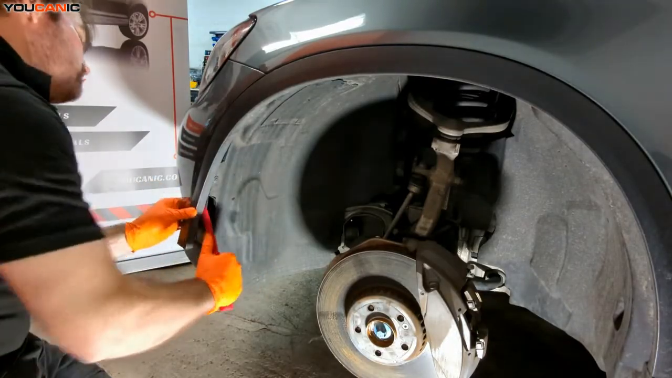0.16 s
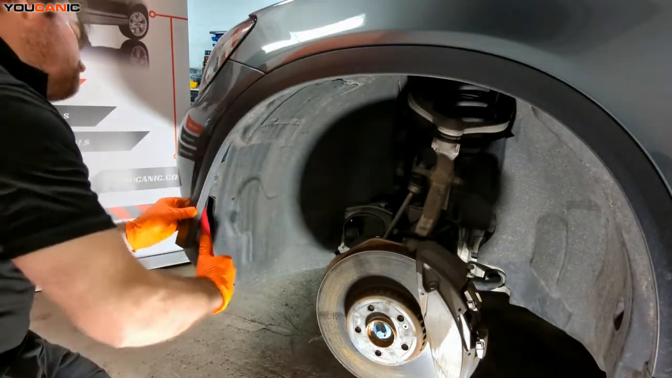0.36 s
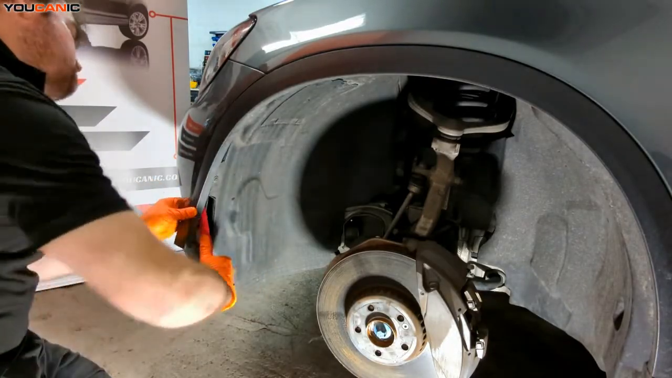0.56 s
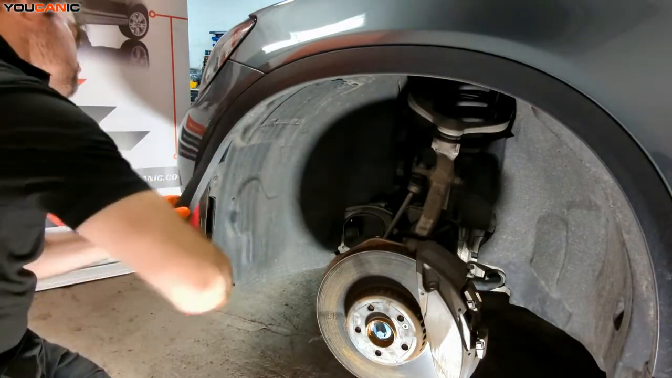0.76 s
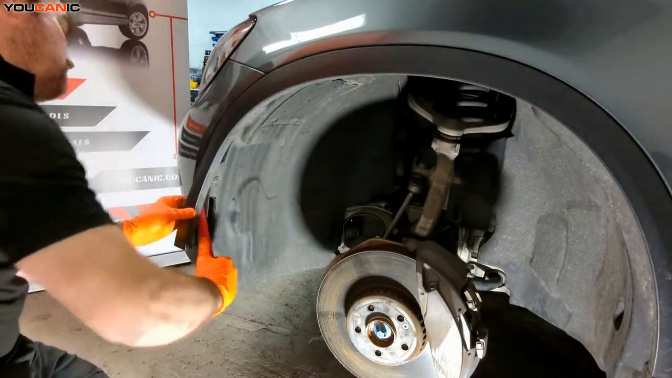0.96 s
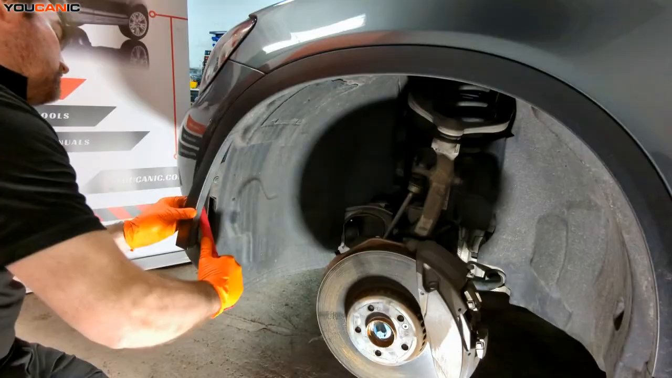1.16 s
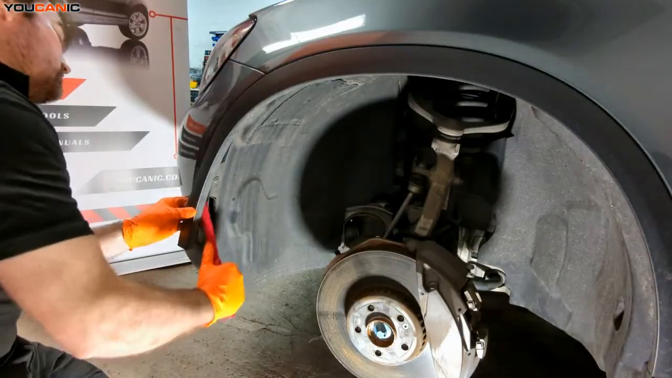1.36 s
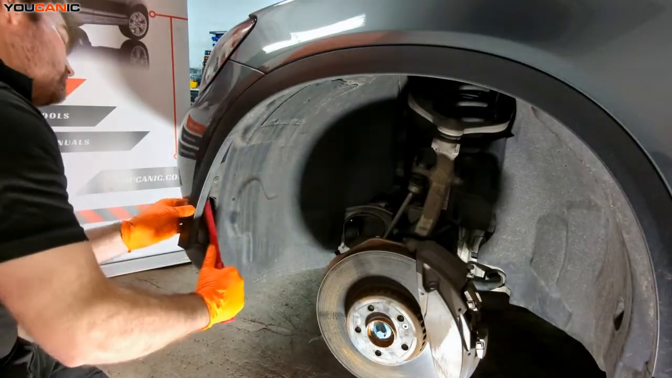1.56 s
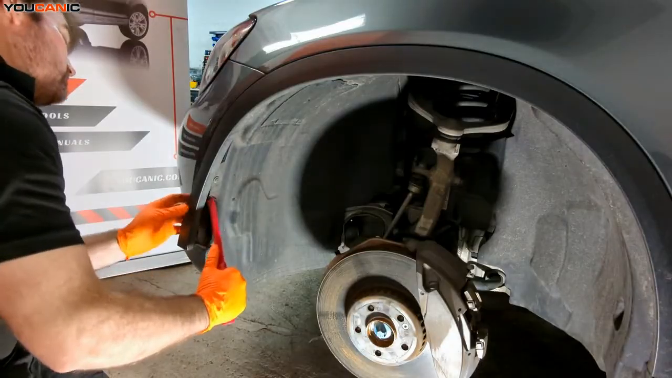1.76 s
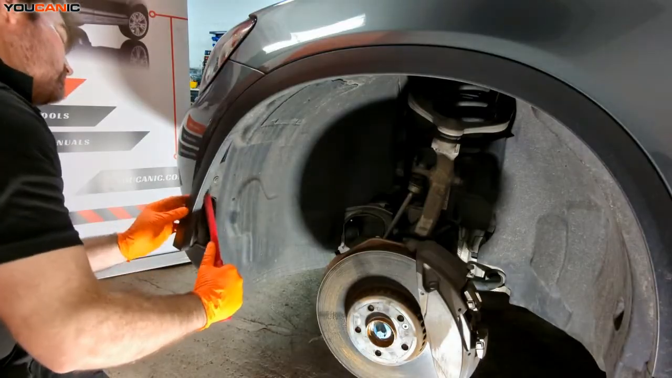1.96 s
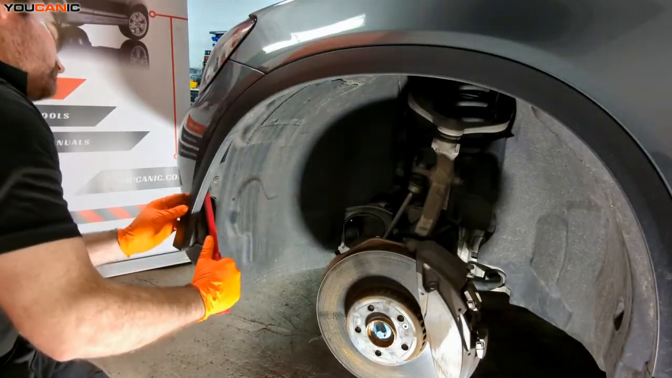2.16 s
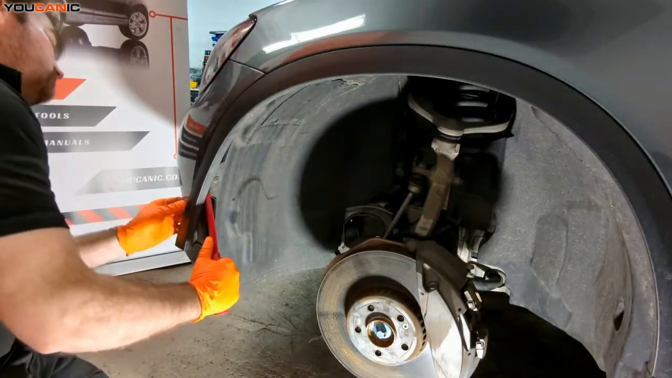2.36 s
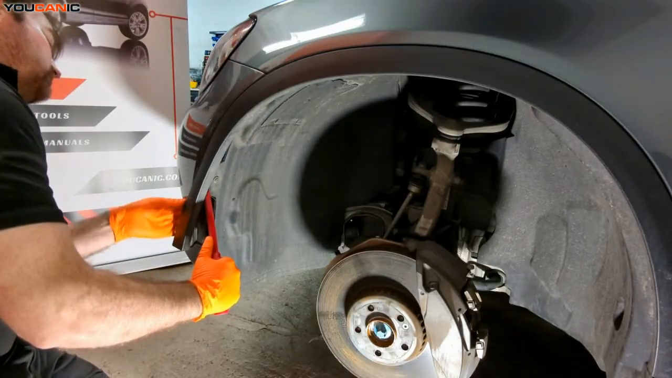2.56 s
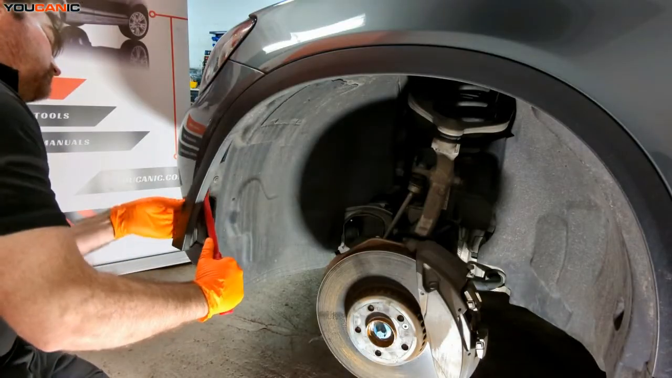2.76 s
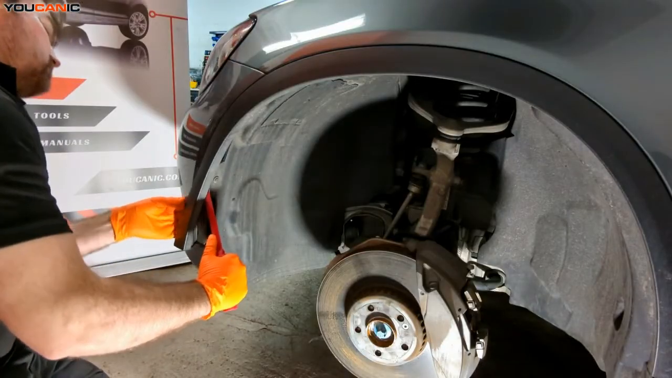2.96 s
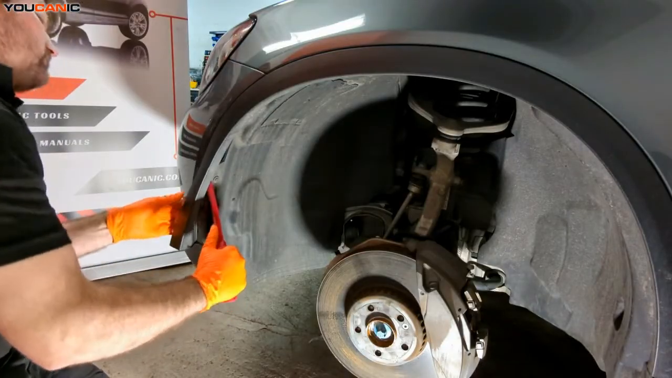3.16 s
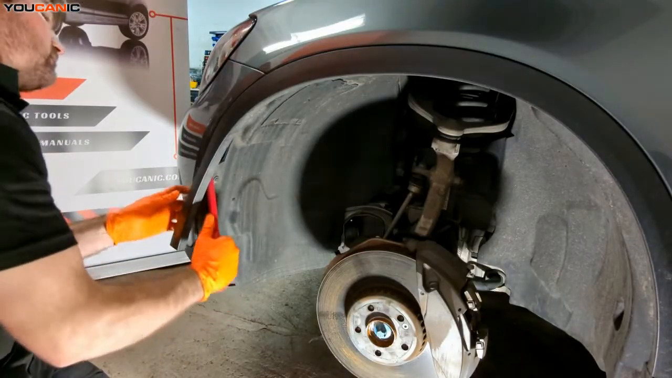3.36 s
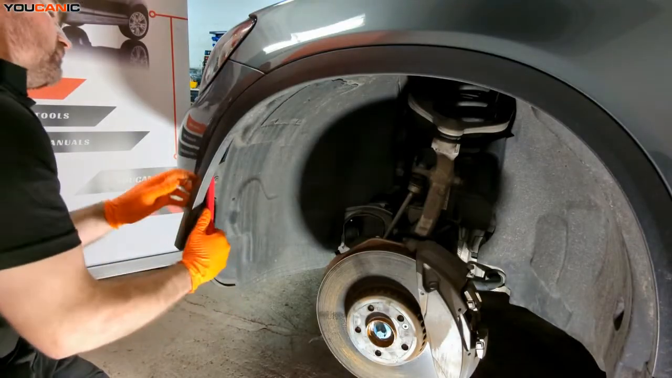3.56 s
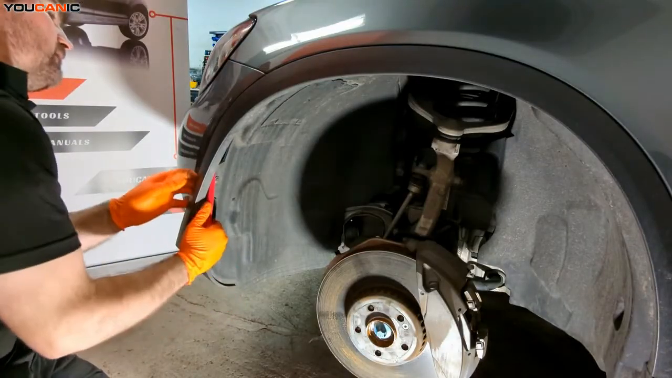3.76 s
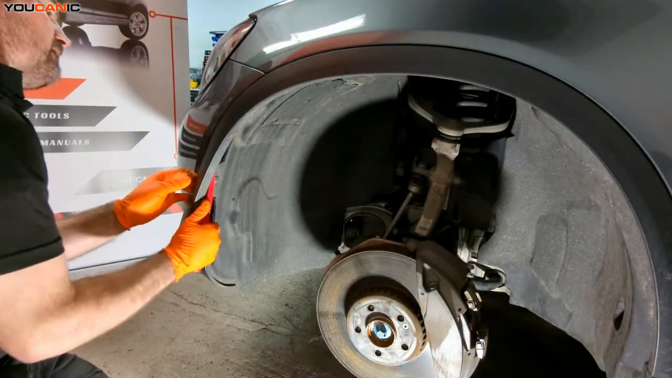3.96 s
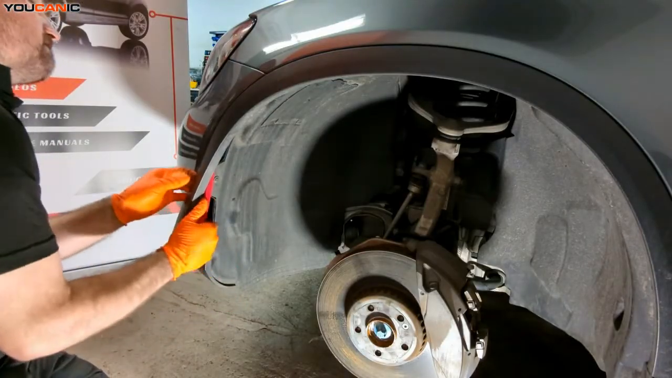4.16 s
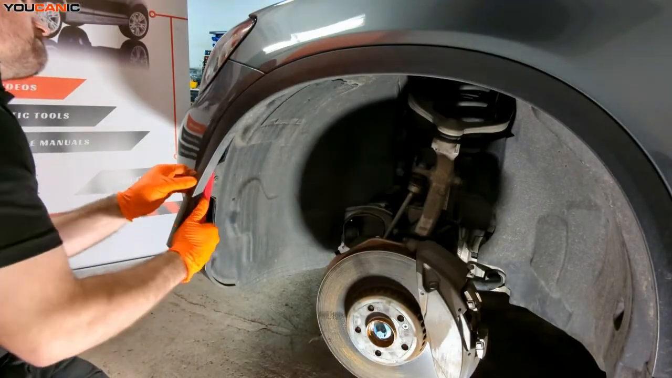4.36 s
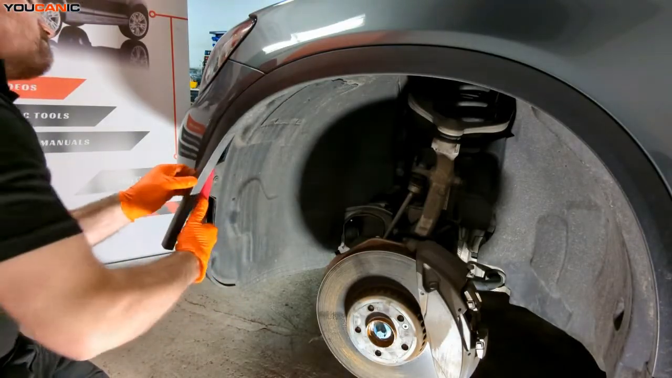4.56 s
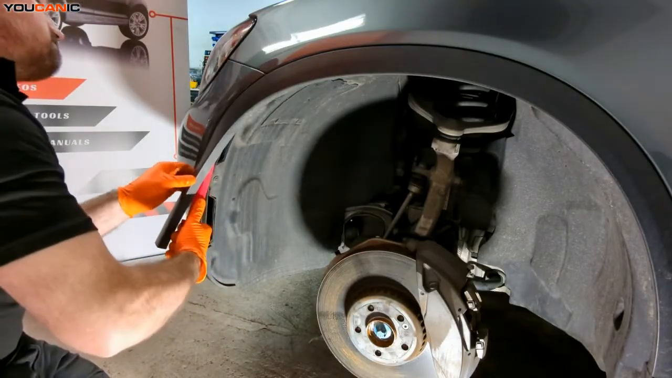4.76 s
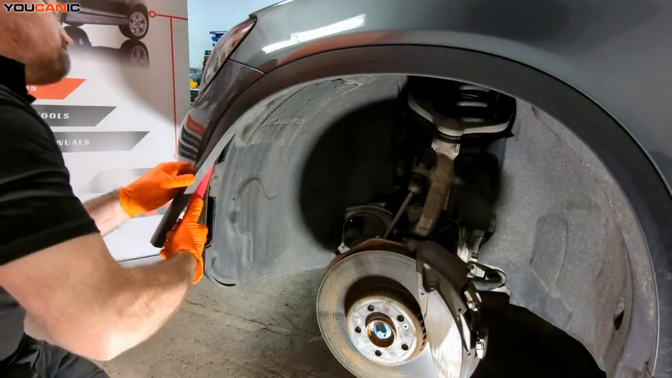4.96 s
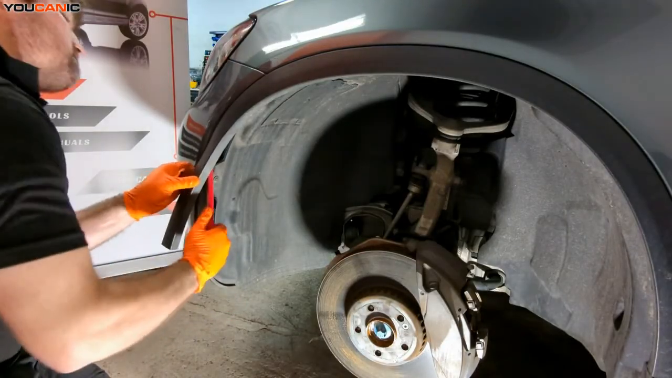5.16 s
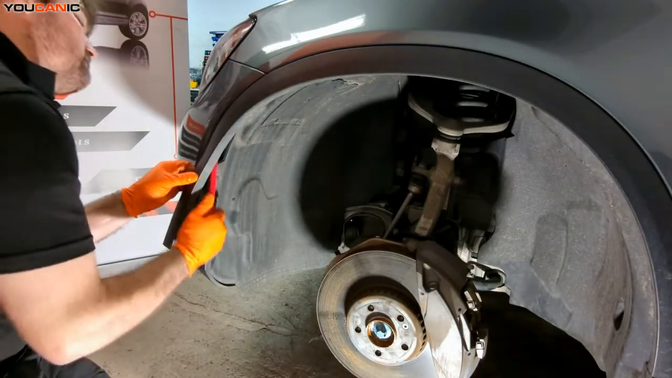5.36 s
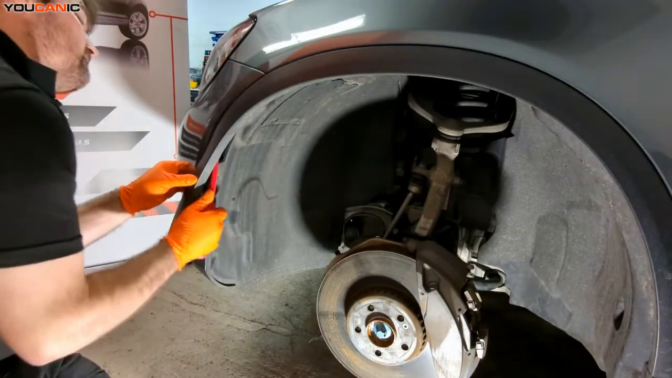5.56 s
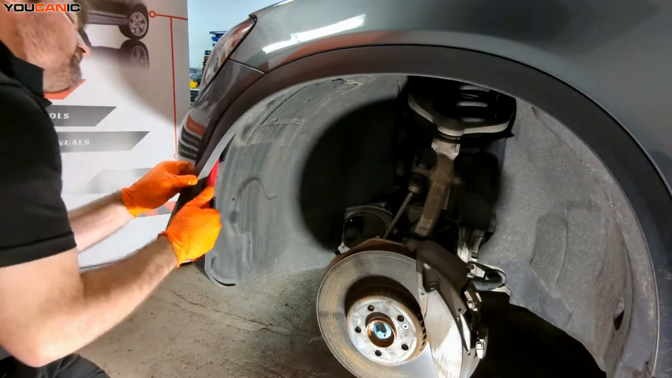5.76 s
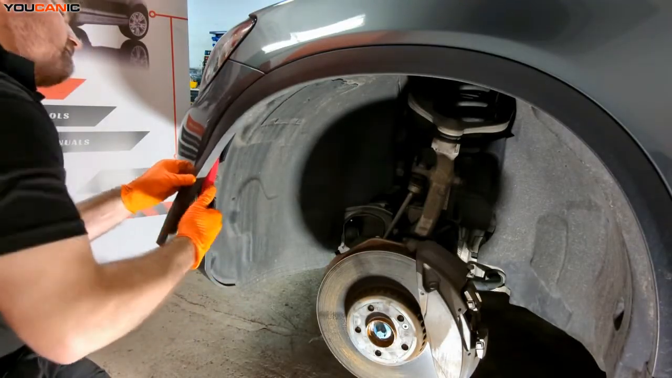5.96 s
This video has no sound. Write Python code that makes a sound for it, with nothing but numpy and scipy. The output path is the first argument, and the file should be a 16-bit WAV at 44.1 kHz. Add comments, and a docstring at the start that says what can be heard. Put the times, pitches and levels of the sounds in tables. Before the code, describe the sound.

Clips snap loose as a plastic strip is levered from a car's wing, with knocks, glove rubbing and a faint machine hum.

```python
"""Plastic trim is levered off a car wheel arch in a bare workshop, over a low machine hum. After a soft
scrape, three clips let go with a crack in the first 2.2 s; each time the strip flexes and the wing panel
rings. From 3 s gloves and tool scrape more busily and the strip thuds on the panel. A last loud clip snaps
at 4.8 s, then light knocks and rubs follow. All along, the right channel slips in steps against the left."""
import sys
import numpy as np
from scipy import signal
from scipy.io import wavfile
from scipy.ndimage import uniform_filter1d

SR = 44100
rng = np.random.default_rng(int(sys.argv[2]) if len(sys.argv) > 2 else 0)


def put_to_file(sound):
    """Save the sound as 16-bit audio at rate SR, in the file named by the first command-line argument."""
    columns = np.atleast_2d(sound).T  # one column per channel
    safe = np.clip(columns, -1, 1)
    whole_steps = np.round(safe * 32767)
    wavfile.write(sys.argv[1], SR, whole_steps.astype(np.int16))


N = 264600

# How long the workshop rings. Each row: frequency in Hz, t60 in seconds.
ROOM_T60 = [(100, 0.64), (200, 0.57), (500, 0.67), (1000, 0.66), (2000, 0.62), (4000, 0.6), (8000, 0.5),
            (14000, 0.4)]
# Stereo image of the noises. Each row: frequency in Hz, left-right likeness from 0 to 1.
STEREO_LIKENESS = [(100, 0.86), (500, 0.55), (1500, 0.057), (5000, 0.11)]


def gain_of(db):
    """Decibels to an amplitude factor."""
    return 10 ** (np.asarray(db) / 20)


def unit_rms(x):
    """Scales to rms 1."""
    return x / np.sqrt(np.mean(x ** 2) + 1e-20)


def curve_at(points, hz):
    """Reads a table on a log-frequency axis."""
    f, value = np.transpose(points)
    return np.interp(np.log(hz + 1), np.log(f + 1), value)


def add(mix, start, sound):
    """Mixes a sound in at a start time in seconds."""
    part = mix[:, round(start * SR):][:, :sound.shape[-1]]
    part += sound[..., :part.shape[1]]


def hump(hz, centre_hz, width):
    """A broad resonance; width is a share of its centre."""
    return 1 / np.sqrt(1 + ((hz / centre_hz - centre_hz / (hz + 1)) / width) ** 2)


def ring(t, hz, t60, rise):
    """One mode: swells over the rise time, then dies."""
    return (1 - np.exp(-t / rise)) * gain_of(-60 * t / t60) * np.sin(2 * np.pi * hz * t)


def stereo_spectra(hz, a, b, c, d):
    """Four random grids become left and right spectra, centred in the bass and wide in the treble."""
    likeness = curve_at(STEREO_LIKENESS, hz)[:, None]
    left = a + 1j * b
    return np.array([left, likeness * left + np.sqrt(1 - likeness ** 2) * (c + 1j * d)])


def noise(colour, patchy_db=0.):
    """A stereo noise bed of a given spectrum; patchy_db adds drifting patches."""
    hz = np.fft.rfftfreq(1024, 1 / SR)
    *grids, patches = rng.standard_normal((N // 256 + 5, 513, 5)).T
    patches = unit_rms(uniform_filter1d(uniform_filter1d(patches, 8, 0), 12, 1))
    spectra = stereo_spectra(hz, *grids) * gain_of(curve_at(colour, hz)[:, None] + patchy_db * patches)
    return unit_rms(signal.istft(spectra, nperseg=1024, noverlap=768)[1][:, :N])


def waver():
    """A slow random wobble of rms 1."""
    return unit_rms(uniform_filter1d(uniform_filter1d(rng.standard_normal(N), 4000), 4000))


def machines():
    """A wavering low hum and faint whines over the air of the shop."""
    # The hum's level ride. Each row: time in seconds, level in dB.
    hum_levels = [(0, -53), (.32, -49), (.45, -61.5), (.65, -49.5), (1.2, -59), (2.2, -53), (2.6, -53),
                  (3.4, -51.5), (3.7, -58), (4.1, -54), (4.4, -64), (5.1, -64), (5.4, -68), (5.8, -67),
                  (6, -55)]
    # Thin machine tones. Each row: pitch in Hz, centre level in dB.
    whine_tones = [(95, -62.5), (452, -75.5), (1108, -83.5)]
    # Room tone. Each row: frequency in Hz, relative level in dB.
    air_colour = [(15, -46), (25, -23.5), (80, -12.5), (120, -32), (166, -10), (200, -39), (270, -21.5),
                  (416, -28), (451, -22.5), (489, -29), (1130, -34.5), (1290, -36.5), (2610, -42.5),
                  (3160, -49), (16000, -66)]
    hum_db = np.interp(np.arange(N) / SR, *np.transpose(hum_levels))
    swell_db = 1.5 * waver()
    sag_hz = 1.1 * np.exp((-62 - hum_db) / 2)  # the pitch sags when the hum grows weak
    hum_hz = 74.3 - sag_hz + 0.49 * waver()
    tones = np.sqrt(2) * gain_of(hum_db + swell_db) * np.sin(2 * np.pi * np.cumsum(hum_hz) / SR)
    for hz, db in whine_tones:
        level = gain_of(db + 5.8 * np.tanh(waver()))
        tones += level * np.sin(2 * np.pi * np.cumsum(hz * (1 + 0.0031 * waver())) / SR)
    return tones + gain_of(-60) * noise(air_colour, patchy_db=-2.0)


def workshop_echo(x):
    """The bare room returns sparse echoes of random sign, each band dying at its own speed."""
    taps = np.zeros((2, SR))
    arrivals = np.arange(200, SR - 10, 10) + rng.integers(0, 10, (2, (SR - 201) // 10))
    np.put_along_axis(taps, arrivals, rng.choice([-1., 1.], arrivals.shape), 1)
    taps[1] += .5 * taps[0]
    hz, t, spectra = signal.stft(taps, SR, nperseg=512)
    decay = gain_of(-60 * t / curve_at(ROOM_T60, hz)[:, None])
    tail = signal.istft(spectra * decay, SR, nperseg=512)[1]
    tail[:, :200] = 0  # pre-delay
    return signal.fftconvolve(x, tail / np.linalg.norm(tail[0]), axes=1)[:, :N]


def scrapes():
    """Rubber and plastic dragged over paint: grainy rustle, a duller squeak and a rumble in the panel."""
    # Strokes of glove or tool. Each row: start, rise, hold and fall in seconds,
    # then rustle, squeak and rumble levels in dB.
    strokes = [(0.093, 0.029, 0.036, 0.081, -60, -63.5, -46.5),
               (1.542, 0.071, 0.094, .035, -67.5, -76, -57), (1.715, .005, .002, .02, -62.5, -81.5, -75),
               (1.88, 0.16, 0.017, .04, -101, -78.5, -53.5), (2.349, 0.018, .002, 0.044, -70.5, -64, -78),
               (2.519, 0.028, 0.0049, .06, -64, -94.5, -59), (3.084, 0.0086, 0.022, 0.11, -57, -61, -61),
               (3.102, .02, 0.048, 0.19, -64, -59.5, -58), (3.257, 0.026, 0.0024, 0.045, -64, -64.5, -51.5),
               (3.346, 0.016, .14, 0.11, -63.5, -63.5, -57.5), (3.404, 0.023, .01, 0.053, -62.5, -71, -61),
               (3.608, .027, .003, .04, -66.5, -84.5, -52), (3.654, 0.038, 0.0022, 0.12, -58, -57.5, -38),
               (3.851, 0.056, .005, .06, -65.5, -66.5, -78), (4.103, 0.01, .002, 0.045, -70, -99, -74.5),
               (4.177, 0.031, 0.17, .03, -71.5, -63.5, -58.5),
               (4.287, .006, 0.011, 0.091, -53, -49.5, -37.5), (4.565, 0.019, .002, 0.037, -59, -53.5, -37),
               (4.627, 0.019, 0.014, 0.039, -66.5, -68.5, -62), (4.681, 0.028, .003, 0.19, -65, -59.5, -55),
               (5.063, 0.04, 0.022, 0.068, -56, -51, -60), (5.325, 0.021, 0.088, 0.11, -56, -55, -59.5),
               (5.664, 0.043, .003, 0.065, -69, -79.5, -65), (5.828, 0.028, .01, .04, -86, -67.5, -70)]
    # The colours of the three layers. Each row: frequency in Hz, relative level in dB.
    rustle = [(2500, -7), (4000, -10.5), (6500, -10), (9000, -12), (13000, -14.5), (16000, -10)]
    squeak = [(600, -8), (1200, 1.5), (2000, 6), (2800, 5.5), (4000, -10), (6000, -50)]
    rumble = [(80, -19), (150, 14), (250, 9), (450, -4.5), (800, -6), (1200, -47)]
    catches_per_s, catch_s, ramp_db = 70, .004, 26
    t, out, levels = np.arange(N) / SR, np.zeros((2, N)), np.zeros((3, N))
    grain = gain_of(2.2 * unit_rms(uniform_filter1d(rng.standard_normal(N), 90)))
    catches = (rng.random(N) < catches_per_s / SR) * rng.exponential(1, N)
    grain *= 1 + gain_of(1.5) * signal.lfilter([1], [1, -np.exp(-1 / (catch_s * SR))], catches)
    for start, rise, hold, fall, *layers_db in strokes:
        top = start + rise
        attack = np.minimum((t - top) / rise, 0)
        release = (top + hold - t) / fall
        levels += gain_of(np.array(layers_db)[:, None] + ramp_db * np.minimum(attack, release))
    for level, (colour, graininess) in zip(levels, [(rustle, .6), (squeak, 1.1), (rumble, .3)]):
        out += level * unit_rms(grain ** graininess) * noise(colour)
    return out


def aftersound(hz, spectrum, room_share, crack_hz, onset):
    """Dense rattle and echo after a blow: noise of the blow's colour, each band dying at its own speed."""
    t = np.arange(130) * 256 / SR
    *grids, lumps = rng.standard_normal((5, 513, 130))
    # loose parts rattle unevenly
    rattle_db = 1.8 * unit_rms(uniform_filter1d(uniform_filter1d(lumps, 25, 0), 3, 1))
    linger = 1 + .18 * hump(hz, crack_hz, 0.27) ** 2  # the crack's own pitch hangs on
    t60 = room_share * curve_at(ROOM_T60, hz) * linger
    decay_db = -60 * (t / t60[:, None]) ** 1.027
    early_db = 2.3 * np.exp(-t / 0.022)  # thrown back by the wheel arch close by
    spectra = stereo_spectra(hz, *grids) * spectrum[:, None] * gain_of(decay_db + rattle_db + early_db)
    tail = signal.istft(spectra / 10, nperseg=1024, noverlap=768)[1]
    return tail * (1 - np.exp(-(np.arange(tail.shape[1]) / SR / onset) ** 2))


def plastic_crack(t, hz, width, contact, fade):
    """A clean first ping, then irregular slips excite the same resonance; stiff overtones add bite."""
    ping = ring(t, hz, 4.6 / (width * hz), 0.11 * contact)
    friction = rng.standard_normal(len(t)) * fade
    slips = signal.fftconvolve(friction, ring(t[:400], hz, 0.0029, .0001))[:len(t)]
    bite = 0.35 * ring(t, 1.1 * hz, 0.0023, 0.083 * contact)
    bite += 0.33 * ring(t, 2.9 * hz, 0.0043, 0.15 * contact)
    return 2 * ping + 0.65 * slips / abs(slips).max() + bite


def trim_blows(blows):
    """Plastic cracks and fizzes briefly; the strip flexes with a thud and the panel behind it rings."""
    # Modes of the wing panel. Each row: pitch in Hz, relative level in dB, t60 in seconds.
    panel_modes = [(237.3, 8.5, 0.091), (334, -2.5, 0.15), (412.3, 3, 0.062), (466.2, -4, 0.26),
                   (564, 0.5, 0.056), (753, -2, 0.077), (1098, -9.5, 0.088), (1340, -8, 0.022)]
    # The spray of treble on a crack. Each row: frequency in Hz, relative level in dB.
    fizz_colour = [(3000, -0.5), (4500, -10.5), (6200, -6), (8000, -11), (12000, -12.5), (16000, -19)]
    pan_db = 6.5  # cracks sit to the left
    out, t, hz = np.zeros((2, N)), np.arange(20000) / SR, np.fft.rfftfreq(1024, 1 / SR)
    fizz_bed = noise(fizz_colour)
    scatters = rng.standard_normal((len(blows), len(panel_modes)))  # no two blows ring the panel alike
    for blow, scatter in zip(blows, scatters):
        (start, crack_db, crack_hz, width, fade_s, fizz_db, thud_db, flex_hz, flex_t60, contact,
         panel_db, bright_db, low_db, room_share) = blow
        fade = np.exp(-t / fade_s) * (1 - np.exp(-t / (0.38 * contact)))
        crack = gain_of(crack_db) * plastic_crack(t, crack_hz, width, contact, fade)
        fizz = gain_of(fizz_db) * fade * fizz_bed[:, round(start * SR):][:, :len(t)]
        thud = gain_of(thud_db) * ring(t, flex_hz, flex_t60, contact)
        panel = sum(gain_of(panel_db + db + 0.53 * k) * ring(t, f * (1 + 0.04 * k), t60, 0.69 * contact)
                    for (f, db, t60), k in zip(panel_modes, scatter))
        add(out, start, (crack + fizz) * gain_of([[pan_db / 2], [-pan_db / 2]]) + thud + panel)
        # the aftersound keeps the colour of each part of the blow
        colours = [
            gain_of(bright_db + crack_db - 2.6) * hump(hz, crack_hz, width) * hump(hz, crack_hz, 1.3),
            gain_of(bright_db + crack_db - 9.5) * hump(hz, crack_hz, 0.39 * width) ** 2,
            gain_of(bright_db + fizz_db - 2.5 + curve_at(fizz_colour, hz)),
            gain_of(low_db + thud_db - 5.5) * hump(hz, flex_hz, 0.68) ** 3,
            *(gain_of(low_db + panel_db + db + 7) * hump(hz, f, 0.28) ** 2 for f, db, _ in panel_modes)]
        tail = aftersound(hz, np.linalg.norm(colours, axis=0), room_share, crack_hz, 1.14 * contact)
        add(out, start, tail * gain_of([[0.13 * pan_db], [-.15 * pan_db]]))
    return out


def strip_knocks():
    """Lists the blows of the strip bumping the wing, all with the same dull tick as their crack."""
    # Each row: start in seconds, tick and thud levels in dB, flex pitch in Hz, contact time in seconds,
    # panel level in dB, low aftersound send in dB.
    knocks = [(0.1288, -65, -37, 182.6, 0.0026, -76, -23), (.1664, -62, -64, 170, 0.0054, -75, -9),
              (.541, -82, -43.5, 164, 0.022, -62, -15), (1.041, -65, -35.5, 213.4, 0.015, -76, 5),
              (1.16, -79, -40, 198.5, 0.0055, -69.5, 13), (1.959, -60, -48, 168, 0.0058, -61.5, 2.5),
              (2.0242, -75, -46.5, 191, .0062, -50, -8.5), (2.687, -55.5, -43.5, 219, .002, -51, -12.5),
              (3.093, -46, -65, 240, 0.0066, -61.5, -3), (3.602, -56, -26, 161, 0.0066, -46.5, -19.5),
              (4.435, -59, -47.5, 219, 0.0035, -58, -22), (4.713, -50.5, -43.5, 213, 0.0023, -60, 8),
              (4.7435, -53, -48.5, 234, 0.0069, -54, -3), (5.072, -47.5, -48, 178, .0098, -52.5, 6.5),
              (5.109, -61, -45, 177, 0.01, -59.5, 9), (5.3415, -53, -43, 194, 0.0076, -50.5, -0.5),
              (5.5332, -74, -45, 164.4, 0.0081, -54, -22)]
    tick_hz, width, fade_s = 1950, 0.37, 0.0036
    flex_t60, bright_db, room_share = 0.22, -8.5, 0.74
    return [(start, tick_db, tick_hz, width, fade_s, tick_db - 12, thud_db, flex_hz, flex_t60, contact,
             panel_db, bright_db, low_db, room_share)
            for start, tick_db, thud_db, flex_hz, contact, panel_db, low_db in knocks]


def cracks_and_thuds():
    """Lists sharp plastic cracks, faint ticks and dull thuds of the strip on the panel."""
    # Each row: start in seconds, crack level in dB, crack pitch in Hz, width as a share of that pitch,
    # fade time of slips and fizz in seconds, fizz and thud levels in dB, flex pitch in Hz, flex t60 and
    # contact time in seconds, panel level in dB, bright and low aftersound sends in dB,
    # aftersound length as a share of the room's t60.
    blows = [(.123, -47, 2230, 0.088, 0.0027, -57.5, -61, 188.5, .085, 0.0037, -64.5, 3.5, 0.5, 0.65),
             (.7165, -11.5, 1870, 0.5, 0.0057, -17, -16.5, 174.2, 0.19, 0.007, -29.5, -1, 8, 0.93),
             (1.3058, -14.5, 2200, 0.6, 0.006, -18, -13, 206.5, .26, 0.0054, -28, -10.5, 2, 0.67),
             (1.445, -44.5, 2680, .13, 0.0076, -64, -56.5, 202, 0.089, .005, -65.5, -8, -9, 0.33),
             (2.1455, -26, 2710, .23, 0.0052, -43.5, -43, 252, 0.11, 0.0032, -56.5, -10, 6, 0.76),
             (3.44, -49.5, 2877, 0.26, 0.007, -57.5, -28.5, 164, 0.071, 0.0022, -79, -8.5, 3, 1.4),
             (3.681, -66, 2000, .6, 0.013, -79, -13.5, 210.5, .08, 0.01, -43, -4, -3, 0.39),
             (3.695, -50.5, 1950, 0.25, .014, -57.5, -36, 93, .15, 0.0071, -47, 4.5, 7.5, 0.39),
             (4.2954, -32, 1870, 0.92, 0.0046, -47.5, -18, 180, 0.033, .0028, -41, -5.5, -3, 0.58),
             (4.3222, -48, 1716, .6, .0041, -47, -28, 228, 0.088, 0.0032, -43.5, -5, -5, 0.7),
             (4.545, -51, 1276, 0.074, 0.0047, -64, -62, 201, 0.14, 0.0025, -81, 3.5, -10, .51),
             (4.574, -36.5, 1950, 0.99, 0.0042, -40, -39, 209, 0.16, 0.012, -38.5, -11, -23, 0.36),
             (4.6004, -44, 2520, 0.4, .0054, -68, -36, 228, 0.084, 0.0074, -38.5, -4, -11, 0.47),
             (4.802, -12.5, 2046, 0.39, .003, -35.5, -18.5, 209.6, .17, 0.0016, -28.5, -9.5, 2, 0.65)]
    return blows


def scene():
    """Cracks, thuds and knocks in front, scrapes with their echo between them, the machines underneath."""
    rubbing = scrapes()
    blows = trim_blows(cracks_and_thuds() + strip_knocks())
    return blows + rubbing + gain_of(-13.0) * workshop_echo(rubbing) + machines()


def record(dry):
    """The right channel jumps from delay to delay with short cross-fades; a low-pass trims the top."""
    # Steps in the stereo image. Each row: start in seconds, right-channel delay in ms (negative is early).
    delay_steps = [(0, .9), (.3, 3), (.45, 5), (.68, 7.4), (.83, 0), (.91, 4.4), (1.06, 1.9), (1.345, -3.9),
                   (1.5, .4), (2.09, 2.2), (2.18, 4.8), (2.33, 7.3), (2.7, 3.1), (3, 5.1), (3.2, 8.1),
                   (3.36, -2.5), (3.65, .3), (5.04, 2.4), (5.33, -7.4), (5.65, 8.6), (5.76, -6.4),
                   (5.83, 1.9)]
    starts, delays_ms = np.transpose(delay_steps)
    step = np.searchsorted(starts, np.arange(N) / SR, "right") - 1
    right = np.zeros(N)
    for k, ms in enumerate(delays_ms):
        crossfade = uniform_filter1d(1. * (step == k), 600)
        right += crossfade * np.roll(dry[1], round(ms * SR / 1000))
    lowpass = signal.firwin(511, cutoff=16500, window=("kaiser", 9), fs=SR)
    return signal.oaconvolve(np.array([dry[0], right]), lowpass[None], "same", axes=1)


dry = scene()
out = record(dry)
put_to_file(out)
```